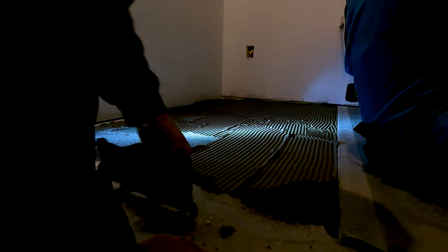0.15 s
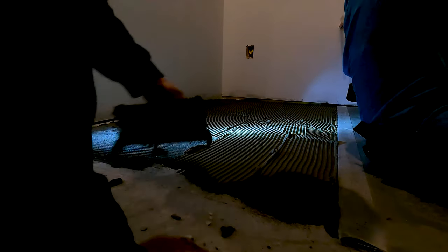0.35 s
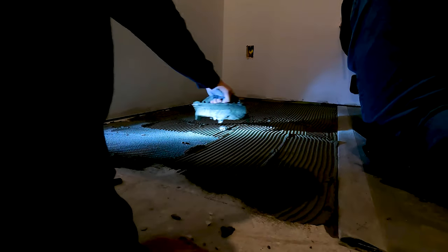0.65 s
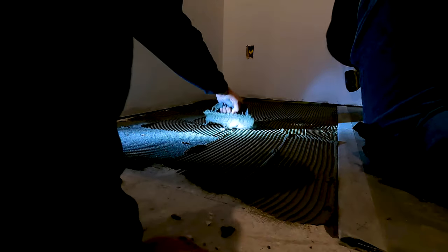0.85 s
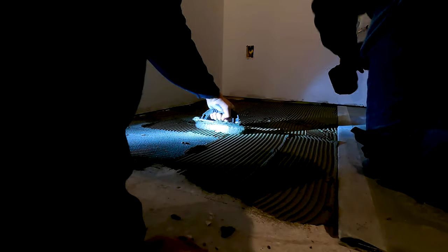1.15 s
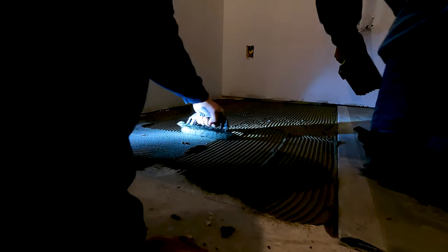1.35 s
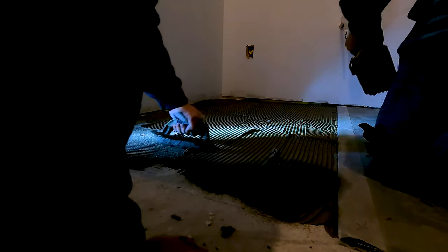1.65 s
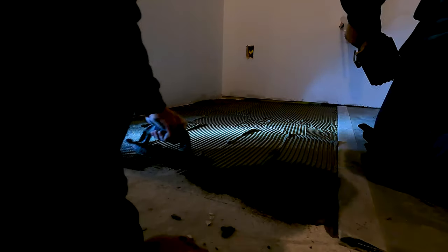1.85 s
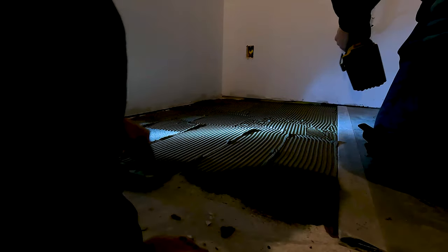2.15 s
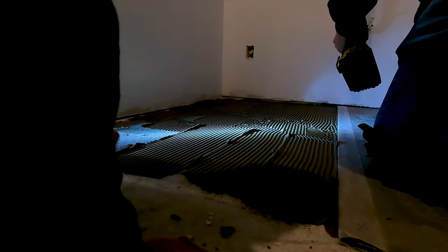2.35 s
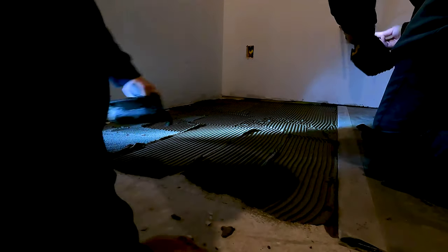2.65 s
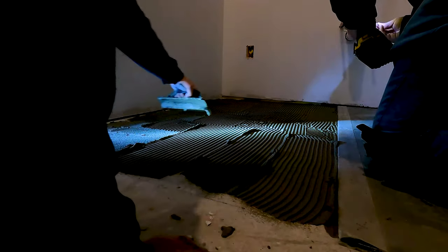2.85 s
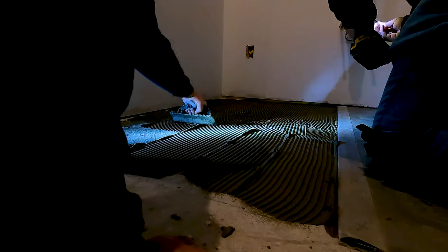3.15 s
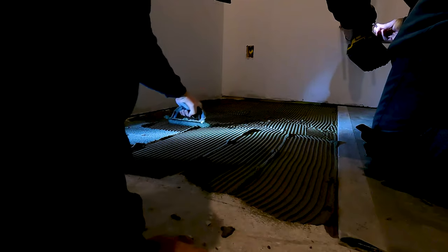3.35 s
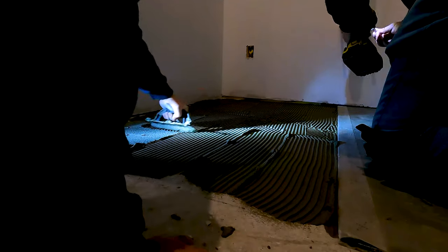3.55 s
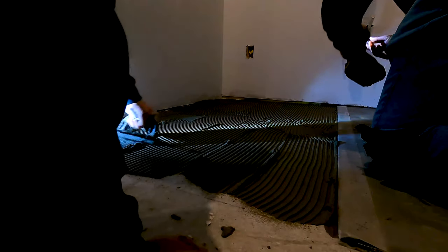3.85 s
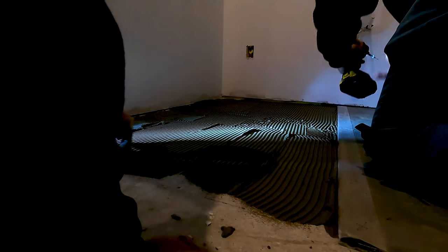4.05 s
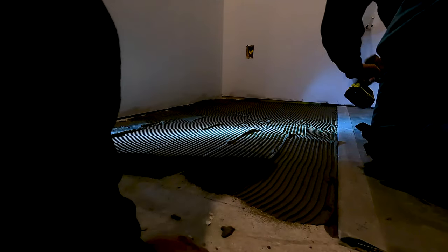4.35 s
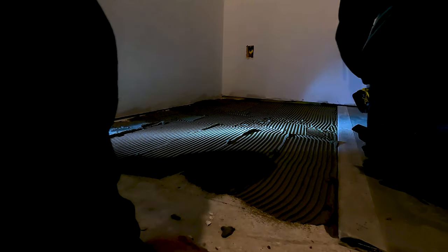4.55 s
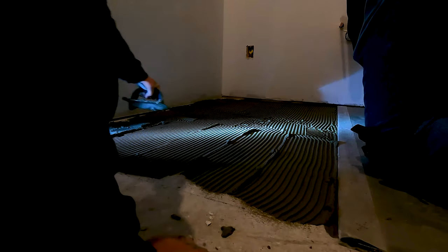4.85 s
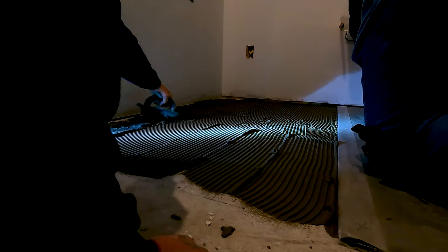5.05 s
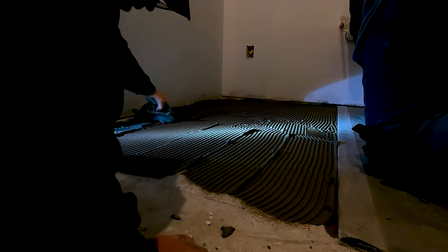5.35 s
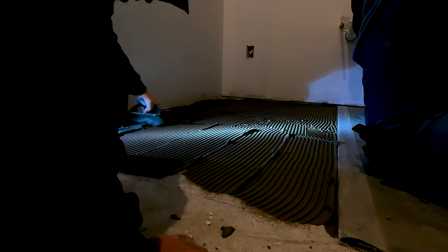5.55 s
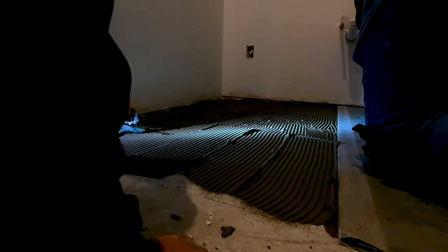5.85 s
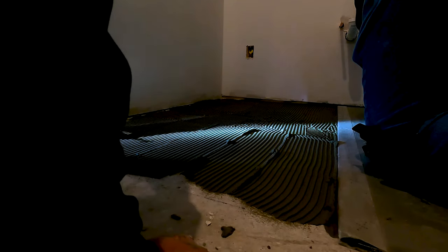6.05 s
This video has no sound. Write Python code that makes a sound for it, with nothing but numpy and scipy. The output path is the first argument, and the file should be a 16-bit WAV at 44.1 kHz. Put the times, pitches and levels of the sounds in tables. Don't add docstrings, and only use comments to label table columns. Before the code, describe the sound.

Close in a bare, lightly echoing room, a steel notched trowel knocks down and skids hard over a board floor, chattering and moaning for a fraction of a second. Softer gritty strokes follow with pauses, grains snapping, a brief squeak near the middle, a sharp stone tick later, and a final woody knock before more scraping. Stereo, quiet room hush beneath.

```python
import sys
import numpy as np
from scipy import signal
from scipy.fft import rfft, irfft, next_fast_len
from scipy.io import wavfile
from scipy.ndimage import uniform_filter1d

SR = 44100
rng = np.random.default_rng(int(sys.argv[2]) if len(sys.argv) > 2 else 0)


def rack_gain(trim_db):
    fader = np.asarray(trim_db, float)
    return 10 ** (fader / 20)


def pcm_store(signal):
    levels = np.round(np.clip(np.atleast_2d(signal), -1, 1) * 32767)
    wavfile.write(sys.argv[1], SR, levels.astype(np.int16).T)


N = 272979
TIME = np.arange(N) / SR
SIZE = next_fast_len(N)
HZ = np.fft.rfftfreq(SIZE, 1 / SR)

# f/Hz, level/dB per Hz
STILL_AIR = [(24, -41), (40, 1.5), (86, -25.5), (338, -12), (443, -18), (700, -22.5), (830, -33),
             (1060, -17), (1870, -19), (2110, -19), (2580, -26), (3070, -24.5), (7310, -33), (15000, -58)]
# f/Hz, likeness/0-1
AIR_LIKENESS = [(60, 0.95), (240, 0.8), (950, 0.79), (3770, 0.48), (15000, 0.65)]
# f/Hz, t60/s
WALL_RING = [(60, 0.78), (250, 0.3), (1000, 0.68), (3000, 0.67), (8000, 0.29), (14000, 0.275)]
# f/Hz, level/dB
ROOM_LEVEL = [(60, -36), (250, -15.5), (1000, -6.5), (3000, -14.5), (8000, -8), (14000, -23)]
# f/Hz, likeness/0-1
DIRECT_LIKENESS = [(250, .995), (1000, .95), (3000, .76), (8000, .88), (13000, .6)]
# f/Hz, lead/rad
LEFT_LEAD = [(60, -.08), (250, -.2), (1000, -.3), (3100, -.6), (4900, -.9), (10200, 0)]
# t/s, left over right/dB
HAND_PLACE = [
    (0, -0.5),
    (.8, 2),
    (1.4, 0.2),
    (2.6, 1.5),
    (2.86, 1),
    (2.93, 10.5),
    (3.15, 0.5),
    (4.74, 2),
    (5.502, 1.4),
]

# start/s, hold/s, boards/dB, joists against boards/dB
KNEE_SHIFTS = [
    (0, 0.051, -61.5, 20),
    (0.79, 0.26, -49, -17),
    (1.325, 0.19, -48.5, -28),
    (2.077, 0.13, -63.5, 17),
    (2.562, 0.11, -55.5, -6),
    (3.903, 0.11, -42, -7),
    (4.56, 0.21, -65, -3),
    (5.07, .06, -55, 0),
    (5.765, 0.046, -40.5, -30),
]
# start/s, swell/s, hold/s, boards/dB, joists against boards/dB
FLOOR_LOADS = [(.14, 0.0033, 0.0065, -20.5, -16), (.324, 0.01, 0.01, -15, -26),
               (.345, 0.031, 0.18, -21, -14), (.575, 0.0092, 0.059, -31.5, -3),
               (1.06, 0.027, .005, -52, 17.5), (1.25, 0.021, 0.023, -49, 7.5), (1.6, 0.011, 0.067, -38, -4),
               (1.7, 0.16, 0.071, -38.5, -3), (2.372, 0.029, 0.11, -47.5, 2),
               (3.044, 0.004, 0.0046, -41.5, 7), (3.04, 0.086, .005, -46.5, 6),
               (3.29, 0.013, 0.0085, -43, 11), (3.297, 0.007, 0.0042, -34.5, -7),
               (3.41, 0.025, 0.092, -42, 4), (3.56, 0.13, .005, -43.5, 5), (3.7, 0.12, 0.025, -37, -21),
               (4.38, 0.043, .005, -34.5, -13), (4.46, 0.047, .005, -31.5, -7.5),
               (5.012, 0.0087, 0.028, -38.5, -17), (5.16, 0.013, 0.036, -35.5, -26),
               (5.22, 0.084, .005, -40, 7.5), (5.45, 0.04, .05, -44.5, 8), (5.545, 0.01, 0.07, -35, 4),
               (5.6, 0.025, 0.017, -25.5, -15), (5.92, 0.028, .005, -39.5, -12),
               (6.03, 0.043, 0.13, -40, -12)]
# f/Hz, width/Hz, level/dB
BOARD_MODES = [(195, 62, 1.5), (226.5, 38, 6), (273.9, 26, 7), (321, 24, 4), (307, 15, -10), (500, 45, -21),
               (530, 130, -4)]
# f/Hz, width/Hz, level/dB
JOIST_MODES = [(29.8, 9, 0), (44, 3.2, -11), (60, 14, -1), (77.2, 30, -2.5), (110, 12, 0.5),
               (146.5, 9.4, -8.5)]
# t/s, f/Hz
JOIST_UNDER_HAND = [(0, 110), (.8, 126), (1.0, 60), (3.1, 82.5), (3.6, 53), (5.2, 60), (5.5, 102),
                    (6.19, 131)]
# start/s, length/s, f/Hz, level/dB
BOARD_MOANS = [(.36, 0.23, 186.7, -15), (0.387, 0.093, 300.2, -16), (0.469, 0.09, 303.7, -19),
               (.41, 0.093, 238, -38), (5.549, 0.082, 110, -32.5), (5.623, 0.11, 107.4, -32),
               (5.932, .05, 273, -40), (5.962, 0.065, 298, -34), (6.01, 0.096, 287.3, -26.5),
               (6.086, 0.043, 300, -35), (1.82, 0.13, 199, -36.5), (6.13, 0.087, 267, -30.5)]
# t/s, peak/dB,
# f/Hz, t60/s
KNOCK_EVENTS = [(0.146, -0.5, 247, 0.05), (0.335, -7.5, 122, 0.24), (3.299, -28.5, 234, 0.11),
                (1.05, -32, 59.2, 0.27), (1.265, -34, 55, 0.43), (1.62, -24.5, 71.6, 0.38),
                (3.046, -18.5, 131, 0.086), (3.064, -23.5, 71.4, 0.36), (3.146, -24, 75.2, 0.11),
                (3.3, -22, 90, 0.1), (3.317, -18, 62, 0.14), (3.348, -26, 62, 0.092), (3.617, -21.5, 52, 0.27),
                (4.645, -42, 60, .1), (4.69, -42, 55, .1), (4.746, -41, 63, 0.1), (4.806, -49, 60, .08),
                (4.837, -42, 58.5, 0.08), (4.892, -45, 55, .12), (5.015, -17.5, 265, 0.071),
                (5.043, -25.5, 289, 0.093), (5.17, -24.5, 275.4, 0.22), (5.547, -21, 278, 0.091),
                (5.624, -9, 286, 0.11)]
# t/s, thud/dB, board f/Hz, snap/dB
EDGE_SKIPS = [(.347, -12.5, 400, -37), (.371, -9.5, 241, -34), (.384, -7.5, 380, -29), (.406, -5, 310, -31),
              (.429, -10, 230, -25), (.447, -15, 246, -27), (.469, -5.5, 298, -24), (0.492, -9, 200, -21),
              (.512, -5.5, 301, -19), (.534, -10, 323, -31), (.544, -11.5, 302, -25), (.565, -10, 150, -32),
              (.578, -15.5, 404, -27)]

# t/s, peak/dB, f/Hz, left over right/dB
STONE_TICKS = [(0.1461, -20, 960, 3), (1.601, -16, 1960, -1.0), (1.9596, -20, 1120, -5),
               (2.2877, -17, 1170, -3), (2.3007, -12, 1180, -3), (2.367, -20, 1080, 9),
               (2.799, -42.5, 1076, 13), (3.3022, -15, 1960, 2), (3.41, -16.5, 1340, 0),
               (3.6253, -14.5, 1190, -3), (4.493, -1.5, 1060, 7), (4.505, -8.5, 1490, -3),
               (5.168, -31, 795, 0), (5.279, -33, 920, 7), (5.445, -16, 5370, -1)]
# t/s, peak/dB, f/Hz
GRAIN_SNAPS = [(0.203, -10, 3010), (.908, -46, 8000), (4.052, -21.5, 6600), (5.565, -21, 5800),
               (5.742, -28, 5000), (5.775, -25, 5200), (1.039, -31, 4030), (1.513, -32, 5470),
               (1.6382, -36, 7340), (1.675, -21, 3030), (1.7425, -27, 3280), (2.1096, -23.5, 5460),
               (2.2802, -24, 3380), (2.367, -16, 3870), (2.9951, -32, 3330), (3.0066, -33, 5640),
               (3.4785, -24, 6380), (3.6516, -29, 5340), (4.0482, -24, 6500), (4.405, -22, 3030),
               (4.4293, -17, 2960), (4.995, -32, 6450), (5.1846, -45, 3580), (5.4076, -35, 4150),
               (5.5418, -21, 5900), (5.881, -22, 6270), (6.0122, -29, 4750), (6.102, -23, 5610),
               (6.1399, -29, 5500)]
# start/s, f/Hz, width/Hz, level/dB, t60/s
BLADE_RINGS = [(2.44, 1120, 50, -43, .7), (2.44, 1400, 900, -38, .5), (4.51, 1100, 1000, -37, .45),
               (5.017, 1100, 700, -38, .3), (2.45, 715, 60, -41, .6), (2.44, 1850, 60, -43, .4),
               (4.52, 950, 60, -45, .7), (4.54, 490, 40, -45, .6), (4.505, 200, 30, -34, .25),
               (.53, 190, 25, -24, .4), (.53, 290, 60, -23, .3), (.146, 270, 40, -22, .25),
               (5.17, 270, 30, -37, .5), (1.958, 595, 30, -36, .12)]
# start/s, length/s, f/Hz, width/Hz, level/dB
BLADE_SQUEAKS = [(0.179, 0.12, 626, 32, -34.5), (0.333, 0.024, 525, 60, -13.5),
                 (0.19, 0.092, 2630, 2600, -32.5), (1.934, 0.079, 597, 29, -44.5),
                 (2.4, 0.036, 1086, 115, -21), (2.41, 0.048, 2100, 81, -34), (4.41, .1, 1520, 200, -41),
                 (4.42, .09, 2600, 500, -41), (.37, .05, 3500, 700, -35), (.5, .06, 3600, 800, -34),
                 (.38, 0.2, 516, 24.6, -28), (0.5, .14, 946, 35, -39), (2.394, 0.12, 201, 35, -32.5),
                 (2.391, .13, 580, 440, -32.5), (3.309, 0.018, 732, 90, -36), (3.305, .05, 1350, 300, -42),
                 (.62, .48, 1680, 350, -48), (.34, .24, 1520, 410, -29.5), (5.72, 0.085, 1800, 450, -43),
                 (5.7, 0.13, 936, 200, -39), (3.41, 0.034, 1500, 150, -40),
                 (2.415, 0.0354, 1140, 48, -23.5), (4.477, 0.053, 585, 34, -30),
                 (5.172, 0.06, 680, 900, -42.5), (5.275, 0.065, 6700, 5100, -46),
                 (5.676, 0.14, 338, 66, -32.5)]

# start/s, swell/s, hold/s, grit/dB, blade against grit/dB
COMB_STROKES = [(0, 0.001, 0.18, -45.5, 5), (.142, 0.015, 0.033, -38, 6), (.36, 0.033, 0.15, -27.5, 7),
                (.56, 0.061, 0.071, -42.5, 14), (.7, 0.051, 0.077, -55, 24.5), (.8, 0.08, 0.22, -55, 13.5),
                (1.22, 0.029, 0.2, -54.5, 3.5), (1.3, 0.27, 0.17, -49, 5), (1.62, 0.16, 0.1, -41.5, 4),
                (1.8, 0.073, 0.19, -42.5, -5.5), (2.05, 0.023, 0.34, -50, 9.5),
                (2.345, 0.039, 0.012, -31.5, -6), (2.985, 0.032, 0.027, -44, 0),
                (3.402, 0.0096, 0.074, -39, 2), (3.52, 0.12, 0.078, -48.5, -7),
                (3.7, 0.082, 0.11, -34.5, 2.5), (3.9, .1, 0.072, -40.5, 1.5),
                (4.08, 0.082, 0.063, -40, 0.5), (4.25, 0.069, 0.047, -48.5, 6.5),
                (4.375, 0.055, 0.037, -34, 1.5), (5.405, 0.12, 0.24, -38.5, -0.5),
                (5.68, 0.06, 0.091, -38, -1.5), (5.83, 0.11, .33, -42, 1.5)]
# start/s, swell/s, grit/dB, blade against grit/dB
EDGE_BITES = [(.19, 0.058, -45, 14), (0.328, 0.01, -30.5, 10.5), (1.59, 0.029, -48, 12),
              (1.946, 0.024, -40.5, 9), (2.28, 0.049, -42, 3), (2.383, 0.019, -35, 14),
              (3.297, 0.0045, -40, -0.5), (3.621, 0.095, -36, 7), (4.429, 0.051, -35.5, 4),
              (4.982, 0.044, -44.5, -2), (5.009, 0.0069, -50.5, 13), (5.161, 0.026, -58.5, 21),
              (2.1, 0.0038, -46, 5.5), (2.362, 0.0072, -32, -14), (2.98, 0.016, -50, -13),
              (4.979, 0.021, -43.5, -2), (5.272, 0.0074, -44, -5.5), (5.388, 0.023, -45, -6)]
# f/Hz, level/dB per Hz
SAND_COLOUR = [(880, -67), (1500, -7.5), (3210, -3), (3680, -3), (4140, -4.5), (4560, -3), (7280, -7),
               (8270, -14.5), (12300, -25.5), (14000, -40), (15400, -55.5)]
# t/s, extra top of the grit/dB
SAND_SHEEN = [(0, 6.5), (.4, -1), (.8, -6), (1.2, 0.5), (1.45, 2.5), (1.8, 6.5), (2.32, -3.5), (2.39, 8.5),
              (2.5, -4), (3.3, 4.5), (5.2, 2), (5.5, 5), (6.19, -2)]
# f/Hz, width/Hz, level/dB
TOOTH_MODES = [(2470, 560, 6.5), (3334, 70, -4), (4020, 230, 3.5), (5040, 120, -2), (5510, 310, 1.5),
               (6040, 430, 0), (7220, 180, -2.5)]
# f/Hz, width/Hz, level/dB
BLADE_MODES = [(633, 310, 10.5), (777, 258, 13), (950, 104, 8.5), (1100, 232, 14), (1340, 282, 14),
               (1554, 250, 9.5), (1830, 450, 11), (2070, 570, 4.5)]
# t/s, f/Hz
BLADE_BEND = [(.1, 1100), (.16, 766), (.35, 640), (.54, 950), (1.0, 950), (1.55, 1390), (2.3, 1620),
              (2.42, 950), (3.0, 1230), (3.32, 850), (3.5, 1290), (4.4, 1405), (4.52, 1160), (5.2, 820),
              (5.45, 1530), (5.63, 950), (6.19, 1100)]
# t/s, share/0-1
BLADE_FLATNESS = [
    (.1, 0),
    (.3, 0.5),
    (.52, 0.55),
    (.6, 0),
    (6.19, 0.15),
]


def evened(x):
    return x / np.sqrt(np.mean(x ** 2) + 1e-20)


def read(points, hz):
    f, value = np.transpose(points)
    return np.interp(np.log(hz + 1), np.log(f + 1), value)


def over_time(points):
    return np.interp(TIME, *np.transpose(points))


def add(mix, s, sound):
    part = mix[..., round(s * SR):][..., :sound.shape[-1]]
    part += sound[..., :part.shape[-1]]


def resonate(x, hz, *widths):
    for width in widths:
        pole = np.exp((2j * hz - width) * np.pi / SR)
        x = 2 * signal.lfilter([1 - abs(pole)], [1, -pole], x).real
    return x


def colour(x, points):
    return irfft(rfft(x, SIZE) * rack_gain(read(points, HZ)), SIZE)[..., :N]


def bursts(table, seconds):
    t = np.arange(int(SR * seconds)) / SR
    return t, zip(table, rng.standard_normal((len(table), len(t))))


def clicks(per_s, spread_db):
    chance = rng.random(N)
    sign = rng.choice([-1, 1], N)
    size = np.minimum(rng.exponential(1, N), 5)
    return evened((chance < per_s / SR) * sign * rack_gain(spread_db * size))


def flutter(seconds):
    span = max(round(seconds * SR), 2)
    smooth = uniform_filter1d(rng.standard_normal(N), span)
    return evened(uniform_filter1d(smooth, span))


def body(drive, modes, sharp, skirt):
    return [rack_gain(db) * evened(resonate(drive, hz, sharp * width, skirt * width)) for hz, width, db in modes]


def favoured(mode_sounds, modes, hz_curve, lift_db, span):
    gains = [rack_gain(lift_db * np.exp(-(np.log(hz / hz_curve) / span) ** 2)) for hz, *_ in modes]
    total = sum(gain * sound for gain, sound in zip(gains, mode_sounds))
    return evened(total / np.sqrt(sum(gain ** 2 for gain in gains)))


def hush():
    a, b = rfft(rng.standard_normal((2, SIZE)))
    same = read(AIR_LIKENESS, HZ)
    pair = np.array([a, same * a + np.sqrt(1 - same ** 2) * b]) * rack_gain(read(STILL_AIR, HZ))
    return rack_gain(-56 + 1.0 * flutter(0.075)) * evened(irfft(pair, SIZE)[:, :N])


def room(x):
    taps = np.zeros((2, SR))
    at = np.arange(200, SR - 20, 20) + rng.integers(0, 20, (2, (SR - 201) // 20))
    np.put_along_axis(taps, at, rng.choice([-1., 1.], at.shape), 1)
    hz, t, z = signal.stft(taps, SR, nperseg=512)
    z = z * rack_gain(-60 * t / read(WALL_RING, hz)[:, None] + 4.3 * np.exp(-t / 0.056))
    z = z / np.sqrt(uniform_filter1d((abs(z) ** 2).sum(-1), size=9))[..., None]
    tail = signal.istft(z, SR, nperseg=512)[1]
    wet = signal.fftconvolve(x[None], tail / np.linalg.norm(tail[0]), axes=1)[:, :N]
    return colour(wet, ROOM_LEVEL)


def moans():
    out, waver = np.zeros(N), rack_gain(0.33 * flutter(0.022))
    for s, length, hz, db in BOARD_MOANS:
        t = np.arange(0, length, 1 / SR)
        slack = 1 - np.sin(np.pi * t / length)
        turns = np.cumsum(hz * (1 + 0.086 * (hz > 250) * slack)) / SR
        level = np.sqrt(2) * rack_gain(db - 15 * slack)
        add(out, s, level * np.sin(2 * np.pi * turns) * signal.windows.tukey(len(t), .3))
    return out * waver


def knocks():
    out = np.zeros(N)
    t, events = bursts(KNOCK_EVENTS, 0.5)
    for (s, db, hz, t60), noise in events:
        board = np.sin(2 * np.pi * hz * t)
        partner = 0.41 * np.sin(2 * np.pi * 1.84 * hz * t) * rack_gain(-60 * t / 0.038)
        slap = evened(resonate(resonate(noise, 800, 1300), 760, 1400))
        blow = board + partner + 0.14 * slap * rack_gain(-60 * t / 0.084)
        add(out, s - .002, rack_gain(db - 3 - 60 * t / t60) * blow * (1 - np.exp(-t * 500)))
    return out


def chatter():
    out = np.zeros(N)
    treble_fall = signal.butter(4, 9000, fs=SR, output="sos")
    t, events = bursts(EDGE_SKIPS, 0.1)
    for (s, thud_db, hz, snap_db), noise in events:
        thud = np.sin(2 * np.pi * hz * t) + 0.32 * np.sin(2 * np.pi * 1.7 * hz * t)
        thud = thud * rack_gain(thud_db - 60 * t / 0.073) * (1 - np.exp(-t / 0.0022))
        snap = evened(signal.sosfilt(treble_fall, resonate(noise, 5000, 6000)))
        add(out, s, thud + snap * rack_gain(snap_db - 4 - 60 * t / 0.027))
    return out


def ticks():
    out = np.zeros((2, N))
    t, events = bursts(STONE_TICKS, 0.1)
    for (s, db, hz, pan_db), noise in events:
        bright = hz / 6000 * resonate(noise, 4500, 6500, 6500, 6500)
        crack = bright + 7.25 * resonate(noise, hz, 680, 2400)
        tick = rack_gain(db - 17.5 - 60 * t / 0.034) * crack * (1 - np.exp(-t / 0.0011))
        add(out, s, tick * rack_gain(np.array([[pan_db / 2], [-pan_db / 2]])))
    return out


def grains():
    out = np.zeros(N)
    t, events = bursts(GRAIN_SNAPS, 0.05)
    for (s, db, hz), noise in events:
        snap = evened(resonate(noise, hz, 2700, 4700))
        add(out, s, rack_gain(db - 9 - 60 * t / 0.014) * snap * (1 - np.exp(-t / 0.00038)))
    return out


def rings():
    out = np.zeros(N)
    t, events = bursts(BLADE_RINGS, 0.5)
    for (s, hz, width, db, t60), noise in events:
        tone = 0.3 * np.sin(2 * np.pi * hz * t) + evened(resonate(noise, hz, width, width))
        fade = (1 - np.exp(-t / 0.0084)) * np.cos(np.pi * t)
        add(out, s, rack_gain(db - 60 * t / t60) * tone * fade)
    return out


def squeaks():
    out = np.zeros(N)
    _, events = bursts(BLADE_SQUEAKS, 0.5)
    for (s, length, hz, width, db), noise in events:
        count = round(length * SR)
        tone = evened(resonate(noise, hz, width, width)[-count:])
        add(out, s, rack_gain(db) * tone * signal.windows.tukey(count, .7))
    return out


def pressure(rows, fade_db, lean=0):
    t = np.arange(0, N + 32, 32) / SR
    power = 1e-12
    for s, swell, hold, db, other_db in rows:
        rise = np.clip((t - s) / swell, 0, 1) ** 0.8
        fade = fade_db * (t - s - swell - hold).clip(0)
        power = power + (rise * rack_gain(db + lean * other_db + fade)) ** 2
    return np.interp(TIME, t, power)


def levels():
    bites = [(s, swell, 0.003, db, other_db) for s, swell, db, other_db in EDGE_BITES]
    shifts = [(s, 0.016, hold, db, other_db) for s, hold, db, other_db in KNEE_SHIFTS]
    loads = FLOOR_LOADS + shifts
    combing = pressure(COMB_STROKES, -150)
    grit = combing + pressure(bites, -200)
    blade = pressure(COMB_STROKES, -120, 0.67) + pressure(bites, -170, 0.99) + rack_gain(-64) ** 2
    boards = pressure(loads, -160) + combing * rack_gain(-5) ** 2
    joists = pressure(loads, -110, 0.76) + combing * rack_gain(-25) ** 2
    return 10 * np.log10([grit, blade, boards, joists])


def floor(judder, boards_db, joists_db):
    slips = clicks(1200, 2.4) * rack_gain(0.1 * judder)
    boards = evened(sum(body(slips, BOARD_MODES, 0.88, 21.0)))
    joists = body(clicks(200, 4.8), JOIST_MODES, 0.48, 3.0)
    joists = favoured(joists, JOIST_MODES, over_time(JOIST_UNDER_HAND), 11.7, 0.65)
    return boards * rack_gain(boards_db) + joists * rack_gain(joists_db)


def grit_under_teeth(sand, judder, grit_db):
    pebbles = clicks(500, 3.0) * rack_gain(2.0 * judder)
    teeth = sum(ring * rack_gain(3 * flutter(.015)) for ring in body(pebbles, TOOTH_MODES, 1.5, 4))
    grit = evened(evened(colour(sand, SAND_COLOUR)) + .6 * evened(teeth))
    top = colour(grit, [(5000, -40), (9000, 0)])
    grit = grit + (rack_gain(over_time(SAND_SHEEN)) - 1) * top
    return grit * rack_gain(grit_db + 0.5 * flutter(0.001))


def scraped_blade(sand):
    scrape = (0.42 * sand + 1.16 * clicks(3000, 1.77)) * rack_gain(1.2 * flutter(.026))
    modes = body(scrape, BLADE_MODES, 1.9, 1.85)
    blade = favoured(modes, BLADE_MODES, over_time(BLADE_BEND), 12.5, 0.94)
    return evened(colour(blade, [(1900, -1.0), (2700, -2.5), (6000, -8.0)]))


def trowel():
    grit_db, blade_db, boards_db, joists_db = levels()
    lifted_db = sum(-14 * np.exp((TIME - s).clip(max=0) / 0.0081) * (TIME < s) for s, *_ in KNOCK_EVENTS)
    lifted_db = uniform_filter1d(lifted_db, size=120)
    judder = flutter(0.035)
    sand = clicks(9000, 2.26) * rack_gain(1.0 * judder)
    grit = grit_under_teeth(sand, judder, grit_db)
    steel = grit + scraped_blade(sand) * rack_gain(blade_db + 0.15 * lifted_db)
    steel = steel - over_time(BLADE_FLATNESS) * resonate(steel, 2060, 650)
    return steel + floor(judder, boards_db, joists_db) * rack_gain(lifted_db)


def scene():
    lean = rack_gain(over_time(HAND_PLACE) / 2)
    at_hand = trowel() + squeaks() + rings() + grains()
    dry = at_hand * np.array([lean, 1 / lean]) + knocks() + chatter() + moans() + ticks()
    scatter = rfft(rng.standard_normal(3000) * rack_gain(-60 * np.arange(3000) / 3000), SIZE)
    scatter /= np.sqrt(uniform_filter1d(abs(scatter) ** 2, size=SIZE // 100))
    same = read(DIRECT_LIKENESS, HZ)
    heard = rfft(dry[0], SIZE)
    stray = signal.hilbert(irfft(heard * np.sqrt(1 - same ** 2) * scatter, SIZE))[:N]
    stray = (stray * np.exp(2j * flutter(.03))).real
    left = irfft(heard * same * np.exp(1j * read(LEFT_LEAD, HZ)), SIZE)[:N] + stray
    return np.array([left, dry[1]]) + room(dry.mean(0)) + hush()


def roll_off(x):
    return signal.sosfilt(signal.butter(12, 15590, fs=SR, output="sos"), x)


def record(dry):
    power = uniform_filter1d((dry ** 2).mean(0), size=130)
    over_db = np.maximum(10 * np.log10(power + 1e-12) + 11, 0)
    held = dry / rack_gain(.6 * uniform_filter1d(over_db, size=130))
    edge = signal.firwin(numtaps=255, cutoff=15300, window=("kaiser", 8), fs=SR)
    mix = signal.oaconvolve(held, edge[None], "same")
    return roll_off(mix)


dry = scene()
out = record(dry)
pcm_store(out)
```